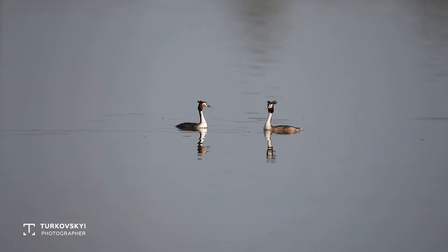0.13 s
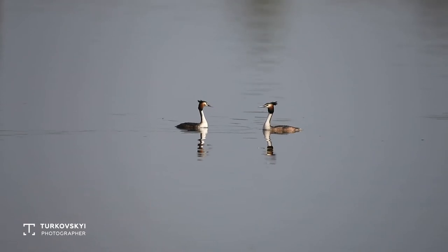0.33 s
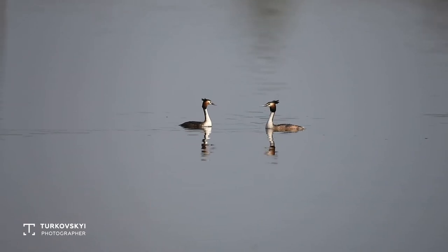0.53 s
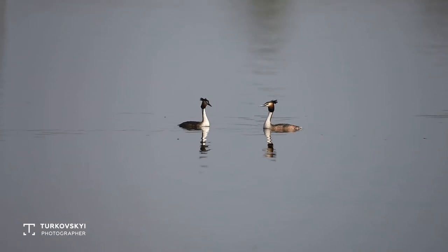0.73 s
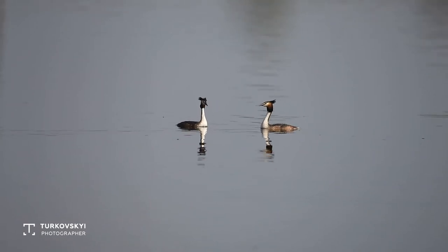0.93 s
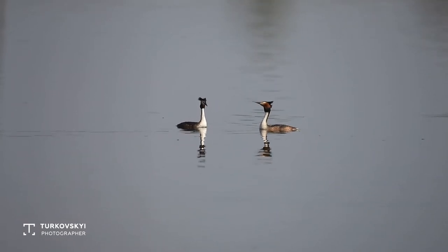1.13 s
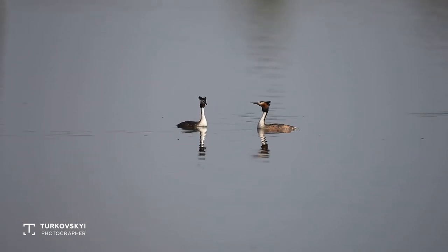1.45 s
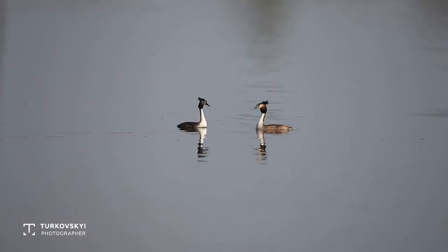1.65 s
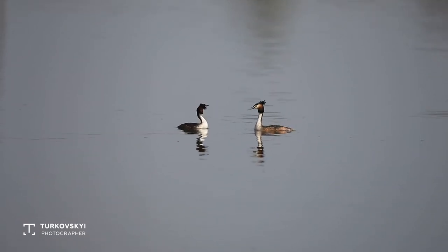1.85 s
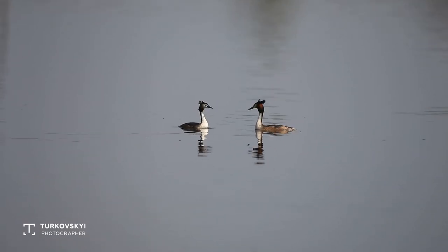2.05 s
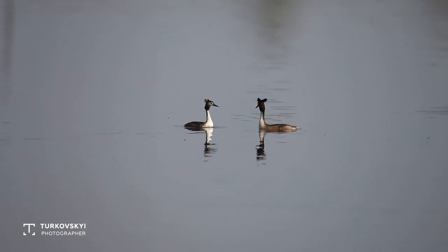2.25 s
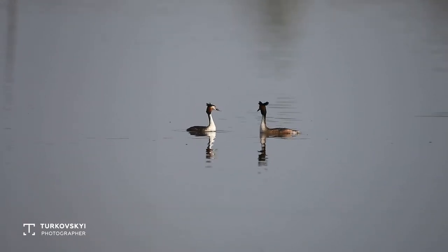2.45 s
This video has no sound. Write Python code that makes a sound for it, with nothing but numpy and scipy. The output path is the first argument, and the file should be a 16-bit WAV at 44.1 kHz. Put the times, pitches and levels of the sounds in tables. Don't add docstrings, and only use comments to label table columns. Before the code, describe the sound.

A water bird's loud, rough rattling trill pulses quickly and fades, a few dull croaks follow far off, then a second bird answers lower and shorter; quiet open lake, faint hum, small handling clicks near the microphone.

```python
import sys
import numpy as np
from scipy import signal
from scipy.fft import rfft, irfft, next_fast_len
from scipy.io import wavfile
from scipy.ndimage import uniform_filter1d

SR = 44100
rng = np.random.default_rng(int(sys.argv[2]) if len(sys.argv) > 2 else 0)


def master_out(mix):
    frames = np.transpose(np.atleast_2d(mix))
    ceiling = np.clip(frames, -1, 1)
    pcm = np.round(ceiling * 32767).astype(np.int16)
    wavfile.write(sys.argv[1], SR, pcm)


def boost_factor(decibels):
    exponent = np.asarray(decibels, float) / 20
    return 10 ** exponent


N = 114660


def unit(x):
    return x / np.sqrt(np.mean(x ** 2) + 1e-20)


def along(points, hz):
    f, v = np.transpose(points)
    return np.interp(np.log(hz + 1), np.log(f + 1), v)


def over_time(points):
    s, db = np.transpose(points)
    return np.interp(np.arange(N) / SR, s, db)


def columns(rows):
    return (c[:, None] for c in np.transpose(rows))


def filtered(x, response):
    m = next_fast_len(N + 8192)
    return irfft(rfft(x, m) * response(np.fft.rfftfreq(m, 1 / SR)), m)[:N]


def rush(spectrum, patchy_db, bins, frames):
    z = signal.stft(rng.standard_normal(N + 512), nperseg=512)[2]
    field = uniform_filter1d(rng.standard_normal(z.shape), bins, 0)
    field = uniform_filter1d(field, frames, 1)
    x = signal.istft(z * boost_factor(patchy_db * unit(field)), nperseg=512)[1][:N]
    return unit(filtered(x, lambda hz: boost_factor(along(spectrum, hz))))


def lay(starts, rows):
    at = np.round(np.asarray(starts) * SR).astype(int)[:, None] + np.arange(rows.shape[1])
    return np.bincount(at.ravel(), rows.ravel(), N + SR)[:N]


# frequency in Hz, level in dB.
SHORE_SPECTRUM = [(400, -43), (650, -4.5), (1200, -0.5), (2200, -8), (2700, -2.5), (3300, -10), (4300, -14),
                  (5100, -41), (6500, -72)]
# time in seconds, level in dB.
SHORE_LEVEL = [(0, -51.5), (.09, -51), (0.124, -53.5), (.9, -51), (1.45, -57), (1.56, -57), (1.8, -55),
               (2.4, -55), (2.55, -52)]
# frequency in Hz, level in dB.
HUM_SPECTRUM = [(24, -35.5), (40, 0), (275, -10), (318, -6), (700, -14.5), (910, -48.5), (1540, -120)]
# time in seconds, level in dB.
HUM_SWELL = [(0, 1), (.35, -0.5), (.6, 3.5), (.95, -0.5), (1.6, -1), (1.9, 4.5), (2.2, 2.5)]
# frequency in Hz, level in dB.
HISS_SPECTRUM = [(2820, -32.5), (4800, -2), (8710, -1.5), (11600, 1.5), (15600, -4)]


def lake():
    hum_db, hiss_db = -61.5, -68.5
    shore = boost_factor(over_time(SHORE_LEVEL)) * rush(SHORE_SPECTRUM, patchy_db=2.8, bins=2, frames=14)
    hum = boost_factor(hum_db + over_time(HUM_SWELL)) * rush(HUM_SPECTRUM, patchy_db=1.5, bins=2, frames=10)
    hiss = boost_factor(hiss_db) * rush(HISS_SPECTRUM, patchy_db=.3, bins=10, frames=10)
    return shore + hum + hiss


# start in seconds, length in seconds, from Hz, to Hz, level in dB.
WHISTLES = [(.9, .31, 5020, 4930, -74), (1.54, .08, 5000, 5060, -75), (1.52, .035, 2800, 2450, -53),
            (1.64, .045, 2950, 2350, -53), (1.81, .09, 6600, 6500, -72), (2.555, .04, 6400, 6600, -69),
            (1.84, .08, 2020, 2000, -59), (1.5, .07, 4100, 3750, -67), (2.02, .1, 4300, 4150, -68),
            (1.17, .15, 1420, 1280, -59), (1.0, .14, 1550, 1700, -57), (2.49, .08, 1100, 900, -53),
            (2.475, .03, 4300, 3950, -63), (.905, .065, 1370, 1300, -47)]
# start in seconds, length in seconds, from Hz, to Hz, level in
# dB.
MORE_WHISTLES = [(0, .04, 1562, 1480, -52.5), (0.067, .04, 2150, 1750, -51), (.1, 0.033, 1760, 1400, -64),
                 (0.075, 0.031, 2544, 2560, -51.5), (0.107, 0.19, 2743, 2650, -62.5),
                 (0.114, .04, 3200, 3350, -61), (.33, .2, 7620, 7600, -76), (0.892, 0.079, 2600, 2450, -60),
                 (0.997, 0.16, 783, 740, -63), (1.04, .07, 2700, 2750, -64), (1.178, .05, 5750, 5800, -74),
                 (1.216, .09, 5340, 5350, -74), (1.249, 0.066, 5810, 5900, -72), (1.27, .04, 6300, 6400, -77),
                 (1.262, .08, 2592, 2600, -55.5), (1.57, 0.129, 1130, 1120, -60.5),
                 (1.722, .21, 1313, 1180, -58), (1.77, 0.096, 3860, 3950, -64),
                 (1.795, .12, 2600, 2620, -61.5), (1.83, 0.098, 812, 800, -57.5),
                 (1.841, .06, 1850, 1740, -61), (2.339, 0.055, 1564, 1450, -53),
                 (2.379, 0.046, 2125, 2090, -62), (2.403, .05, 1168, 1050, -53),
                 (2.443, 0.046, 2650, 2600, -57)]
CHORUS_HZ = [950, 1200, 1600, 2050, 2650, 2750, 2900]


def whistles():
    count, chorus_db, flutter_hz = 36, -67, 33
    when, span, pitch, bend, size = rng.random((count, 5)).T
    hz = np.array(CHORUS_HZ)[(pitch * len(CHORUS_HZ)).astype(int)] * (.95 + .1 * size)
    chorus_level = chorus_db + 8 * size - 5 * pitch
    chorus = np.c_[when * N / SR, .03 + .07 * span, hz, hz * (.9 + .15 * bend), chorus_level]
    s, length, from_hz, to_hz, db = columns(np.r_[WHISTLES, MORE_WHISTLES, chorus])
    t = np.arange(SR // 3) / SR
    progress = np.clip(t / length, 0, 1)
    drift = np.cumsum(rng.standard_normal((len(s), len(t))), 1) * (.03 + from_hz / 1.6e5)
    glide_hz = from_hz + (to_hz - from_hz) * progress
    tone = np.sin(2 * np.pi * np.cumsum(glide_hz, 1) / SR + drift)
    flutter = 1 + .45 * np.sin(2 * np.pi * flutter_hz * t + drift)
    envelope = boost_factor(db + 3) * np.abs(np.sin(np.pi * progress)) ** .6
    return lay(s[:, 0], envelope * flutter * tone)


# start in seconds, rise in seconds, 60 dB decay in seconds, level in dB.
RUSTLES = [
    (.03, 0.0035, 0.45, -66.5),
    (0.854, 0.0023, 0.076, -38.5),
    (1.908, 0.043, 0.58, -51),
    (1.948, 0.024, 0.27, -52.5),
    (2.03, 0.016, 0.17, -53.5),
    (2.235, 0.0015, 0.067, -44.5),
]
# frequency in Hz, level in dB.
CLOTH_SPECTRUM = [(2650, -31), (4500, -3.5), (5200, -18), (7530, -5.5), (8570, -8.5), (15600, -24)]


def rustles():
    t = np.arange(SR // 2) / SR
    s, rise, t60, db = columns(RUSTLES)
    envelope = lay(s[:, 0], boost_factor(db - 60 * t / t60) * (1 - np.exp(-t / rise)))
    unevenness = unit(uniform_filter1d(rng.standard_normal(N), size=40))
    grains = rng.standard_normal(N) * boost_factor(5.5 * unevenness)
    spectrum = [(500, -38), (1500, -6.0), (3500, -20.5)] + CLOTH_SPECTRUM[1:]
    return envelope * unit(filtered(grains, lambda hz: boost_factor(along(spectrum, hz))))


# start in seconds, peak in dB.
TICKS = [(0.028, -55), (.3197, -44.5), (1.203, -52), (1.828, -53), (1.929, -42), (1.936, -40),
         (1.9542, -33.5), (2.0413, -46), (2.0745, -40), (2.0884, -36.5), (2.171, -50), (2.2937, -45)]


def ticks():
    t = np.arange(200) / SR
    s, db = columns(TICKS)
    clicks = lay(s[:, 0], boost_factor(db - 60 * t / 0.0017) * rng.standard_normal((len(s), 200)))
    return filtered(clicks, lambda hz: 1 / (1 + (5000 / (hz + 1)) ** 4) / (1 + (hz / 12000) ** 8))


# start in seconds, peak in dB, knock in Hz, boom in Hz,
# 60 dB decay in seconds.
THUMPS = [
    (0.024, -44, 327, 197, 0.064),
    (1.693, -48, 217, 119, 0.061),
    (1.764, -26, 324, 153, 0.038),
    (1.948, -41.5, 622, 390, 0.075),
    (2.046, -32.5, 175, 71.4, 0.016),
    (2.095, -33, 300, 177, 0.02),
]


def thumps():
    boom_lag_s, crack_db, crack_hz = .011, -1, 3200
    t = np.arange(SR // 2) / SR
    s, db, knock_hz, boom_hz, t60 = columns(THUMPS)
    modes = np.sin(2 * np.pi * knock_hz * t) + .5 * np.sin(2 * np.pi * 1.514 * knock_hz * t)
    knock = lay(s[:, 0], boost_factor(db - 60 * t / t60) * (1 - np.exp(-t / 0.0009)) * modes)
    sinking = np.sin(2 * np.pi * boom_hz * (t - 4.0 * t * t).clip(0))
    boom = lay(s[:, 0] + boom_lag_s, boost_factor(db - 5.0 - 30 * t / t60) * sinking * (t < .16))
    burst = boost_factor(db + crack_db - 60 * t / .045) * (1 - np.exp(-t / .002))
    crack = lay(s[:, 0], burst * rng.standard_normal((len(s), len(t))))
    crack = filtered(crack, lambda hz: 1 / (1 + (hz / crack_hz) ** 6 + (600 / (hz + 1)) ** 2))
    return knock + boom + crack


# frequency in Hz, 60 dB decay in seconds.
ECHO_DECAY = [(500, .12), (1200, .13), (2000, .15), (3000, .1), (5000, .08)]


def echo(x):
    hz, t, z = signal.stft(rng.standard_normal(SR // 2), SR, nperseg=256)
    decay = boost_factor(-60 * t / along(ECHO_DECAY, hz)[:, None])
    tail = signal.istft(z * decay, SR, nperseg=256)[1]
    delayed = np.pad(x, (400, 0))
    scattered = signal.fftconvolve(delayed, tail / np.linalg.norm(tail))[:N]
    return boost_factor(-6) * filtered(scattered, lambda hz: 1 / (1 + (hz / 3800) ** 4))


def rattle(swells, throat, opening, side, rise_s, sharp, width_hz, jitter, scatter_db, rough, gain_db,
           fill_db=-60):
    sag_hz_per_s = 6040
    s, rate, *shape = np.transpose(throat)
    cycles = np.cumsum(np.interp(np.arange(N) / SR, s, rate)) / SR
    beats = np.flatnonzero(np.diff(np.floor(cycles))) / SR
    luck = rng.standard_normal((2 * len(beats), 20))
    at = np.repeat(beats, 2)
    stray = luck[:, 0] * np.tile([jitter, .4], len(beats))
    at = np.clip(at + stray / np.interp(at, s, rate), 0, N / SR)
    onset, peak_db = np.transpose(swells)
    sounding = np.abs(at[:, None] - onset - .03).min(1) < .07
    weight = np.tile([1, rough], len(beats))[sounding]
    at, luck = at[sounding], luck[sounding]

    age = np.clip(at[:, None] - onset + 0.018, 0, 1)
    swell = (age / rise_s * np.exp(1 - age / rise_s)) ** sharp
    parts = boost_factor(peak_db) * swell
    bite = swell.max(1) ** 1.1
    size = parts.sum(1) * boost_factor(scatter_db * luck[:, 1]) * weight
    since_peak = age[np.arange(len(at)), parts.argmax(1)] - rise_s

    low, upper, third = (np.interp(at, s, c) for c in shape)
    s, *levels = np.transpose(opening)
    upper_db, third_db, bright_db = (np.interp(at, s, c) for c in levels)
    sagging = low - sag_hz_per_s * np.clip(since_peak, -.02, .02)
    modes = [(sagging, width_hz, 0), (upper, 1.825 * width_hz, upper_db), (third, 1.34 * width_hz, third_db)]
    modes += [(hz, w, db + bright_db * (hz > 2400)) for hz, w, db in side]
    modes += [(np.sqrt(upper * third), 1.17 * width_hz, third_db + fill_db)]

    u = np.arange(SR // 50) / SR
    rings = 0
    for k, (hz, w, db) in enumerate(modes):
        level = boost_factor(db + 1.3 * luck[:, k + 2]) * (1 if k == 1 else bite)
        wavering_hz = hz * (1 + .012 * luck[:, -k - 1])
        ring = np.exp(-np.pi * w * u) * np.sin(2 * np.pi * wavering_hz[:, None] * u)
        rings = rings + (-1) ** k * level[:, None] * ring
    soft_attack = (1 - np.exp(-u / 0.00096)) ** 2
    voice = lay(at, boost_factor(gain_db) * size[:, None] * rings * soft_attack)
    return filtered(voice, lambda hz: 1 / (1 + (720 / (hz + 1)) ** 12) / (1 + (hz / 4300) ** 16))


# start in seconds, peak in dB.
GRUMBLES = [(.15, -43), (.172, -41.5), (.195, -33.5), (.218, -51), (1.062, -36), (1.098, -40), (1.175, -41),
            (2.5, -39), (2.52, -39.5), (2.545, -42), (2.58, -40)]
# time in seconds, pulse rate in Hz, low, upper and third resonance in Hz.
GRUMBLE_THROAT = [(0, 225, 874, 900, 1000)]
# time in seconds, upper, third and brightness in dB over the low one.
FAR_OPENING = [(0, 0, 0.4, 0)]


def grumbles():
    return rattle(GRUMBLES, GRUMBLE_THROAT, FAR_OPENING, [], rise_s=.02, sharp=4, width_hz=110,
                  jitter=.08, scatter_db=2.5, rough=.6, gain_db=0)


# start in seconds, peak in dB.
CROAKS = [
    (0.088, -52),
    (0.988, -34),
    (1.146, -29),
    (1.709, -28),
    (1.851, -41),
    (1.946, -37),
    (1.998, -40),
]
# time in seconds, pulse rate in Hz, low, upper and third resonance in Hz.
CROAK_THROAT = [(0, 320, 1290, 1730, 2080)]
# frequency in Hz, width in Hz, level in dB.
CROAK_SIDE = [(860, 440, 4), (2230, 240, -22), (2500, 220, -32)]


def croaks():
    return rattle(CROAKS, CROAK_THROAT, FAR_OPENING, CROAK_SIDE, rise_s=.021, sharp=5, width_hz=170,
                  jitter=.06, scatter_db=2.5, rough=.3, gain_db=0)


# start in seconds, peak in dB.
ANSWER = [(2.059, -22), (2.11, -20), (2.137, -19), (2.158, -20), (2.182, -18), (2.211, -14.5), (2.233, -19),
          (2.257, -14), (2.282, -24), (2.305, -24), (2.323, -34.5)]
# time in seconds, pulse rate in Hz, low, upper and third resonance in Hz.
ANSWER_THROAT = [(2.053, 230.5, 941, 1100, 1240), (2.179, 220.1, 995, 1155, 1273),
                 (2.331, 179.2, 956, 1180, 1223)]
# time in seconds, upper, third and brightness in dB over the low resonance.
ANSWER_OPENING = [(2.05, 2.9, -5, -0.5), (2.19, 2.9, -4.5, -3), (2.248, 2.9, -3, -2),
                  (2.32, 2.9, -13, -4.5)]
# frequency in Hz, width in Hz, level in dB.
ANSWER_SIDE = [(809, 174, -6), (1586, 263, -6), (1980, 230, -12), (2600, 182, -7), (2970, 340, -17),
               (3570, 190, -14), (3940, 250, -18)]


def answering_rattle():
    return rattle(ANSWER, ANSWER_THROAT, ANSWER_OPENING, ANSWER_SIDE, rise_s=0.02, sharp=5.62,
                  width_hz=66.0, jitter=0.041, scatter_db=1.0, rough=0.46, gain_db=-2)


def dipped(x, throat, depth):
    hz, t, z = signal.stft(x, SR, nperseg=512)
    s, *_, third = np.transpose(throat)
    off = (hz[:, None] - 1.133 * np.interp(t, s, third)) / 160
    return signal.istft(z * (1 - np.clip(depth, 0, 1) * np.exp(-off ** 2)), SR, nperseg=512)[1][:N]


# start in seconds, peak in dB.
LONG = [(0.241, -16), (0.281, -17), (0.317, -14.5), (0.339, -17), (0.366, -18), (0.399, -11),
        (0.437, -13.5), (0.477, -10.5), (0.519, -12), (0.561, -10.5), (0.606, -11.5), (0.651, -10),
        (0.695, -11.5), (0.74, -12.5), (0.785, -13.5), (0.84, -18), (0.878, -18.5), (0.917, -24),
        (0.951, -41)]
# time in seconds, pulse rate in Hz, low, upper and third resonance in Hz.
LONG_THROAT = [(0.239, 281.2, 1150, 1965, 2580), (0.332, 270.7, 1200, 1808, 2540),
               (.42, 260.7, 1210, 1756, 2390), (0.499, 259.4, 1192, 1702, 2142),
               (.65, 254.7, 1202, 1608, 2058), (0.802, 240.7, 1222, 1554, 2060),
               (0.948, 222.1, 1346, 1553, 2044)]
# time in seconds, upper, third and brightness in dB over the low resonance.
LONG_OPENING = [(0.241, 2.5, -4, -16), (0.299, 5, -2.5, -5), (0.36, 8.5, -8.5, 3), (.5, 2.5, -3.5, 4.5),
                (0.801, -3, -8, 3), (0.951, -24, -16, -6)]
# frequency in Hz, width in Hz, level in dB.
LONG_SIDE = [(800, 120, -24), (980, 120, -14), (1600, 250, -9), (2650, 200, -17), (2980, 200, -18),
             (3370, 200, -20), (3780, 250, -22)]


def long_rattle():
    voice = rattle(LONG, LONG_THROAT, LONG_OPENING, LONG_SIDE, rise_s=0.022, sharp=4.03, width_hz=87.5,
                   jitter=0.037, scatter_db=0.5, rough=0.4, gain_db=-3, fill_db=1.0)
    return dipped(voice, LONG_THROAT, depth=1.0)


def scene():
    answer = answering_rattle()
    birds = whistles() + grumbles() + croaks() + answer + long_rattle()
    reflected = echo(birds - 0.21 * answer)
    hand = rustles() + ticks() + thumps()
    return (lake() + hand + birds + reflected)[None]


def roll_off(x):
    return signal.sosfilt(signal.butter(12, 15720, fs=SR, output="sos"), x)


def record(dry):
    mix = filtered(dry[0], lambda hz: (hz < 15800) / (1 + (38 / (hz + 1)) ** 4))[None]
    return roll_off(mix)


dry = scene()
out = record(dry)
master_out(out)
```